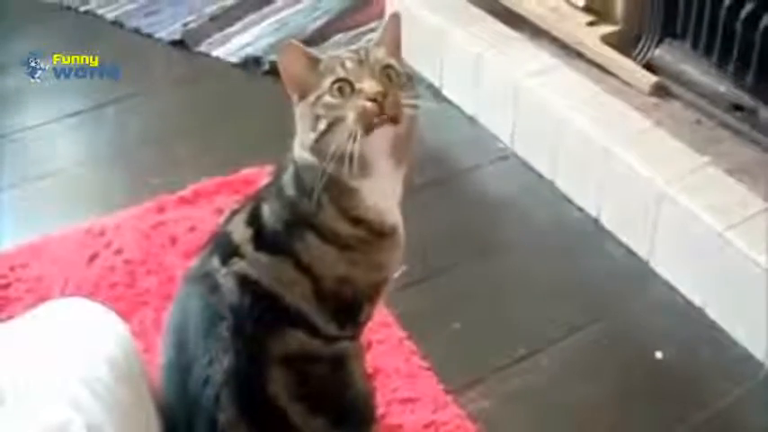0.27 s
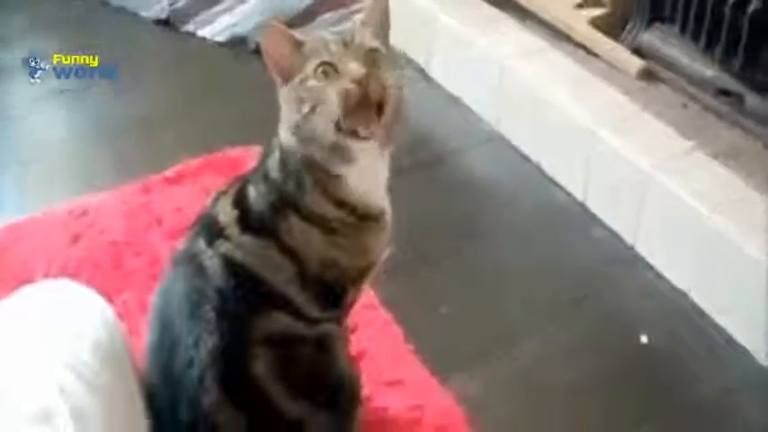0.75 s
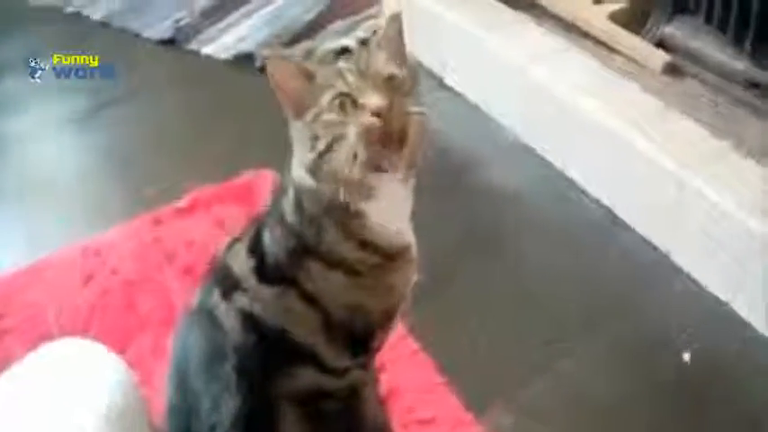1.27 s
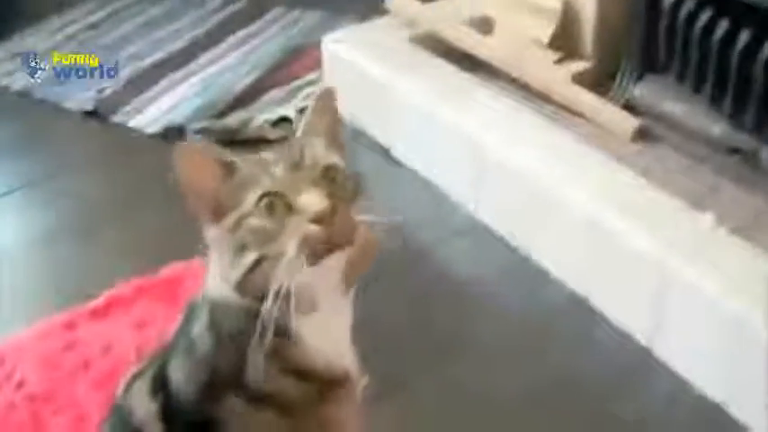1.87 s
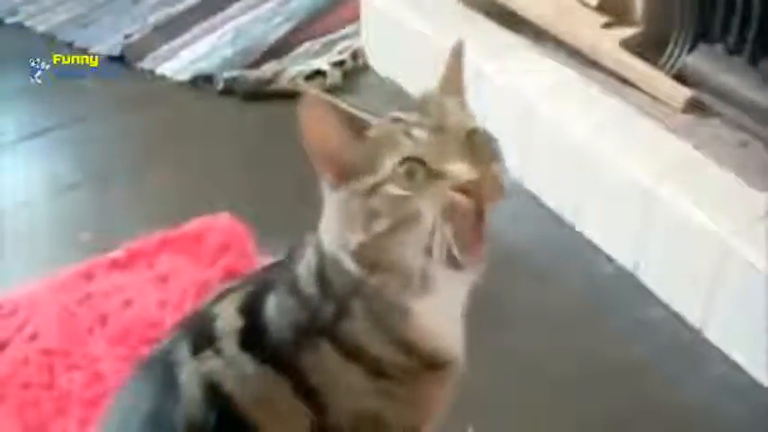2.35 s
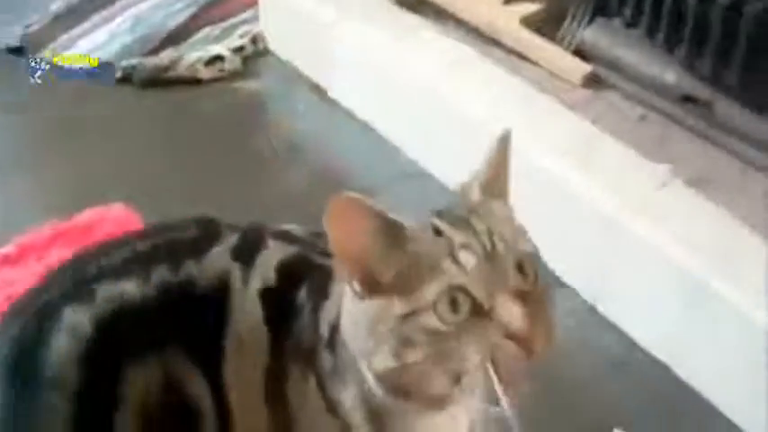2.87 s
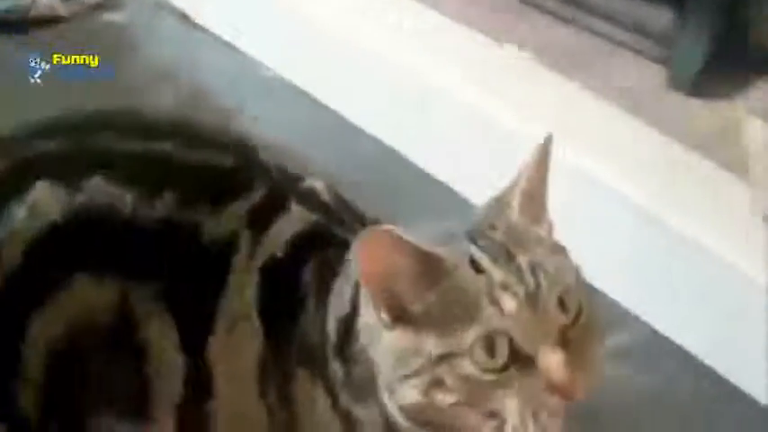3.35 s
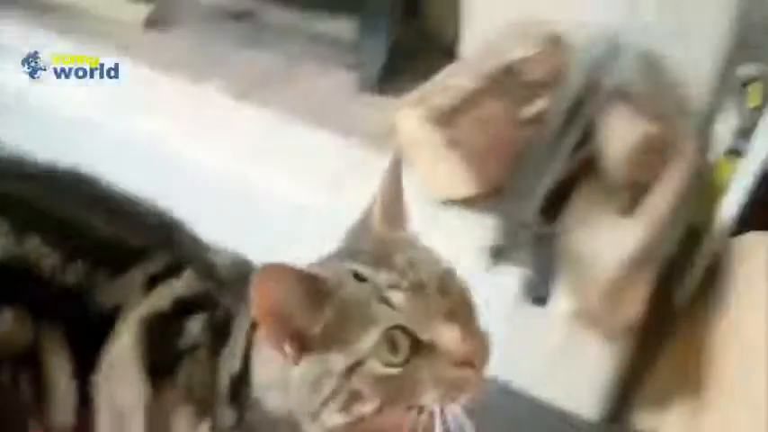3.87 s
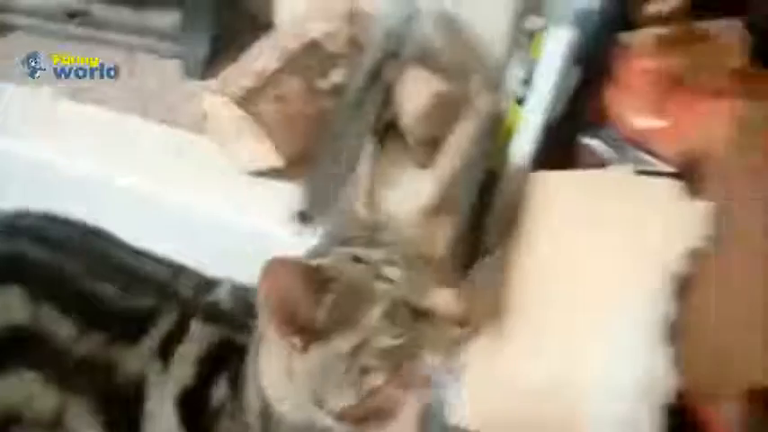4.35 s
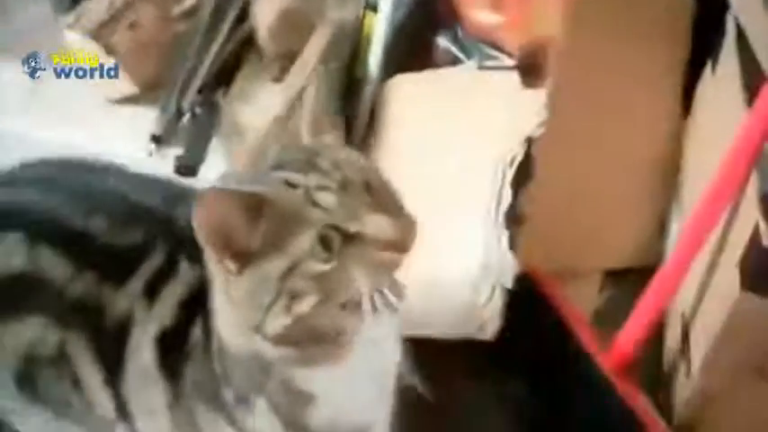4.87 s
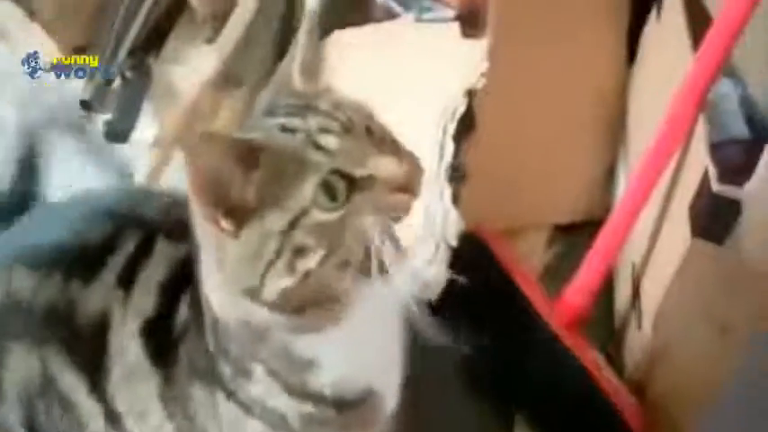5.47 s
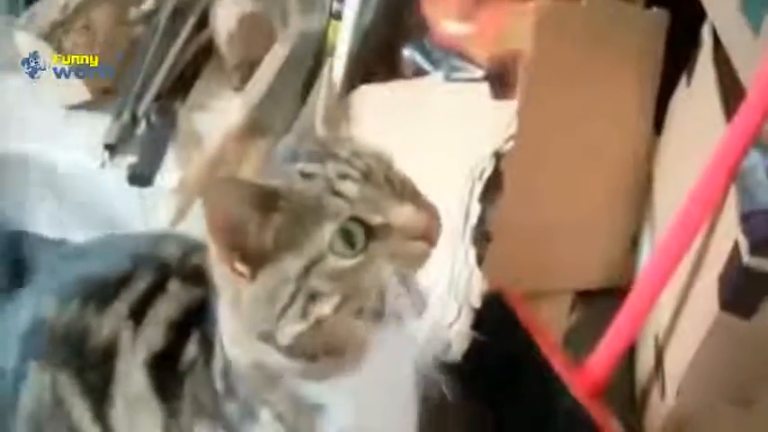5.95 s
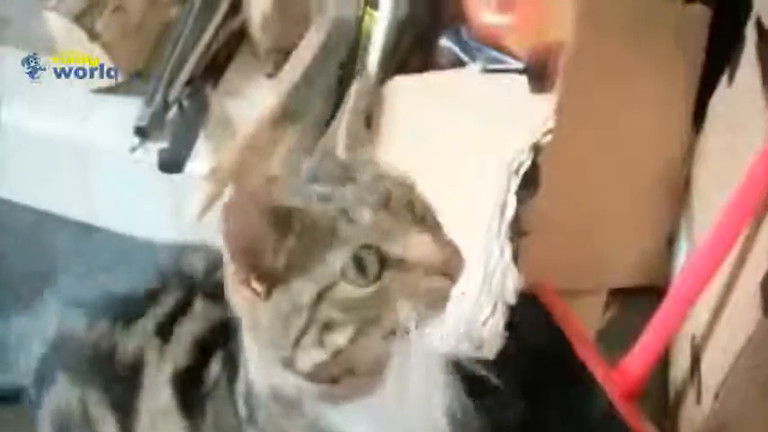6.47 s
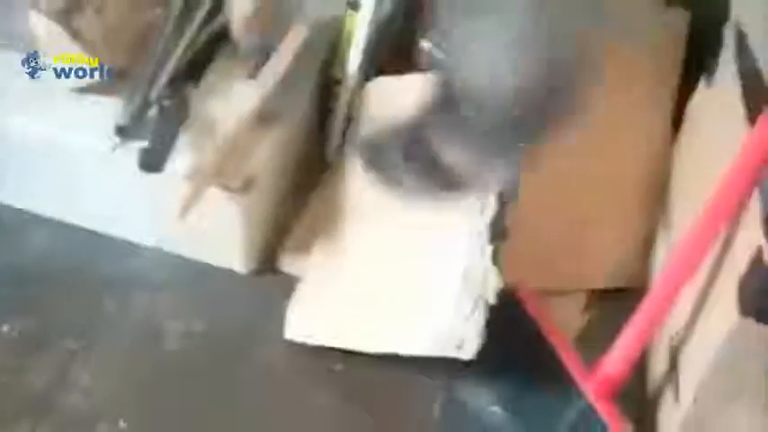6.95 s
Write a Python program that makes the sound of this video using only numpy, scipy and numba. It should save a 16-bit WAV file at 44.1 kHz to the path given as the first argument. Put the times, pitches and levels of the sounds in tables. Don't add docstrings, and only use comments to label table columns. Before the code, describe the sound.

A cat close to a cheap hand-held recorder makes clusters of very short, creaky, clicking chirps, with crisp tongue and tooth clicks among them. Quiet at first, they grow stronger after two seconds, when a few dull taps sound far off. A small tick hits the recorder before five seconds, and at seven a bump rattles it. Steady hiss and a short tiled-room echo surround everything.

```python
import sys
import numpy as np
from scipy import signal
from scipy.fft import rfft, irfft, next_fast_len
from scipy.io import wavfile
from scipy.ndimage import uniform_filter1d
from numba import njit

SR = 44100
rng = np.random.default_rng(int(sys.argv[2]) if len(sys.argv) > 2 else 0)


def level_to_linear(level):
    exponent = np.asarray(level, float) / 20
    return 10 ** exponent


def digitize_waveform(pressure):
    field = np.atleast_2d(pressure).T
    bounded = np.clip(field, -1, 1)
    quanta = np.round(bounded * 32767).astype(np.int16)
    wavfile.write(sys.argv[1], SR, quanta)


N = 317947

# start [s], voiced length [s], level as the mouth opens [dB], level as the folds stop [dB].
CALLS = [(0.170, 0.026, -26.5, -22), (0.300, .030, -32, -27), (0.75, .031, -26.5, -24.5),
         (0.873, 0.022, -32, -27), (0.975, 0.02, -24.5, -26), (1.412, .020, -38, -41),
         (1.514, 0.0136, -38, -30), (2.409, 0.032, -26, -16.5), (2.530, .022, -23, -22.5),
         (2.627, 0.011, -26, -20), (3.065, 0.0361, -26, -17), (3.219, 0.033, -21.5, -13),
         (3.336, .017, -25, -23), (3.811, 0.0236, -21.5, -15), (3.976, .012, -35.5, -28.5),
         (4.631, .010, -26, -24.5), (4.803, 0.02, -29, -29), (5.233, .031, -22.5, -15),
         (5.392, .020, -27, -22), (6.027, .031, -19, -15), (6.190, 0.023, -27, -15.5),
         (6.535, 0.028, -21.5, -12), (6.678, .030, -34, -30), (6.814, 0.0218, -21, -16)]
# mouth resonance [Hz], tooth-gap resonance [Hz],
# upper mouth level [dB].
MOUTH_SHAPES = [(2100, 3440, -23), (2026, 3500, -28), (2000, 3300, -27), (1990, 3530, -27.5),
                (2100, 3170, -26.5), (2050, 3490, -33.5), (1816, 3440, -33), (2090, 3342, -21),
                (2000, 3420, -27.5), (2030, 3400, -26.5), (2005, 3540, -25), (2160, 3280, -21),
                (2010, 3430, -26.5), (2150, 3480, -22.5), (1890, 3350, -31), (2040, 3190, -28.5),
                (1970, 3330, -28.5), (2110, 3234, -19.5), (2110, 3280, -20.5), (2070, 3510, -21),
                (2150, 3650, -20.5), (2128, 3230, -20.5), (1710, 3970, -28), (2080, 3100, -23.5)]
UPPER_SWELL_DB = (-12, -3.5, -0.5, -6, -17.5)
# start [s], length [s], level [dB], throat resonance [Hz],
# share by which the shut jaw lowers the mouth resonance.
THROAT_ONSETS = [(0.169, 0.032, -34.5, 894, .02), (0.296, .016, -29, 880, .01),
                 (0.751, 0.0245, -34.5, 874, .01), (0.975, .012, -35.5, 930, .01),
                 (2.406, 0.0287, -32, 971, .01), (2.527, .028, -35.5, 941, .01),
                 (3.062, 0.027, -33, 1050, .06), (3.218, .022, -27, 970, .01), (3.328, .016, -25, 985, .01),
                 (3.976, 0.01344, -31, 830, .01), (4.800, .026, -36.5, 1110, .02),
                 (5.233, .045, -29, 1000, 0.057), (5.384, .034, -32.5, 1020, 0.11),
                 (6.026, 0.034, -29.5, 1160, 0.14), (6.179, 0.043, -33, 1100, 0.091),
                 (6.535, .022, -27.5, 880, .01), (6.679, .033, -30, 900, .01),
                 (6.798, 0.022, -20.5, 978, 0.041)]
# centre [Hz], width [Hz], level [dB].
UPPER_MOUTH_RESONANCES = [(2772, 250, 0), (3300, 310, 0.5), (4150, 330, -18)]
# time [s], peak
# [dB], ring [Hz], ring t60 [s], crack relative to ring [dB].
MOUTH_CLICKS = [(0.189, -12, 2100, .03, -3), (2.431, -13, 2080, .02, 0), (5.253, -6.5, 1940, .014, -4),
                (5.312, -22, 2000, 0.055, -10), (6.213, -10, 2150, .012, -2), (6.5595, -11, 2120, .02, -4),
                (0.889, -17, 2049, 0.0264, 0), (1.3986, -15.5, 2074, 0.0169, -1),
                (1.546, -13, 1970, 0.024, -5), (3.166, -15, 2006, 0.0194, -4),
                (3.1858, -9, 2146, 0.018, -2), (3.3558, -7, 2062, 0.034, -1.5),
                (3.991, -12.5, 1974, 0.025, -5), (3.9949, -8, 1955, 0.024, -3),
                (4.6364, -13, 2080, .022, -3), (5.1803, -12, 2170, 0.0074, -6),
                (5.2053, -16, 2397, .008, -4), (5.4066, -4, 2170, 0.0086, -9),
                (5.422, -11.5, 3300, 0.013, -5), (6.713, -16.5, 4387, .012, -5),
                (5.7634, -18, 2256, .015, -3), (5.8638, -21.5, 2211, 0.0146, -6),
                (6.5058, -9, 2540, 0.0084, -4), (7.1173, -12.5, 2240, 0.0077, -3.5)]
# time [s], peak [dB], ring [Hz].
FAR_TAPS = [(2.085, -22, 748), (2.129, -22.5, 750), (2.177, -23, 730), (2.278, -21.5, 772),
            (2.504, -26.5, 648)]
# time [s], peak [dB], ring [Hz], ring t60 [s].
BODY_KNOCKS = [(3.991, -19.5, 121, 0.026), (4.9432, -9, 1410, 0.00356), (4.9434, -6, 3300, 0.0018),
               (4.9467, -16.5, 1000, 0.0041), (7.068, -12, 204, 0.0147), (7.0717, -10.5, 500, 0.0083),
               (7.0739, -10, 758, 0.017), (7.076, -9.5, 980, 0.0071), (7.135, -33, 35, 0.14),
               (7.164, -4.5, 148, 0.018), (7.163, -7.5, 1290, 0.00356), (7.1699, -5, 224, 0.0216),
               (7.177, -14, 88.3, 0.046), (7.191, -5.5, 679, 0.0147), (7.195, -7, 833, 0.0136),
               (7.197, -10, 2800, 0.0022), (7.188, -13, 49.87, .15), (7.208, -13, 600, 0.012)]
# frequency [Hz], level [dB per Hz].
HISS_SPECTRUM = [(7, -20), (12, 4), (17, -4), (32, -13), (60, -14.5), (120, -15), (500, -15), (1080, -16),
                 (2500, -18), (4500, -20.5)]
# frequency [Hz], gain [dB].
TOP_EDGE = [(4600, 0.5), (5150, -3.5), (5400, -10), (5900, -11), (6400, -20), (6800, -31.5), (7000, -43.5),
            (7250, -75)]
# time [s], level [dB].
TOP_BAND_OPENING = [
    (3.811, -65),
    (3.831, -44),
    (3.871, -76.5),
    (3.876, -83),
]

CREAK_HZ, HUM_HZ = 273.22, 510
FIRST_SLAP = .3
ATTACK_S, ATTACK_DB = .003, -9
CUT_S, LEAK_DB, LEAK_FOLLOWS = .011, -27.5, .4
TAIL_S, TAIL_DB = .032, -7.5
UPPER_FOLLOWS = .5
THROAT_ATTACK_S, THROAT_ATTACK_DB, THROAT_SAG_DB = .004, -8, -4
THROAT_RELEASE_S, THROAT_RELEASE_DB = .01, -8
JAW_DROPS_AT, JAW_DROP_S = .58, .003
JAW_RISE = .035
SHUT_JAW_DB = -60
MOUTH_WIDTH_HZ, TEETH_WIDTH_HZ, THROAT_WIDTH_HZ, UNDERTONE_HZ = 143, 140, 240, 500
ROOM_T60_S, ROOM_DB = .18, -15
HISS_DB = -32.5
OFFSET, OFFSET_WANDER = -.0161, .004


def chatter():
    db, level, hz, upper_db, teeth_hz = call_controls(mouth_calls())
    throat_db, throat_level, throat_hz, shut = call_controls(throat_calls())
    calling, throat_on = db > -75, throat_db > -70
    closed = np.clip((throat_db - db + 4) / 6, 0, 1)
    airy = np.clip((upper_db + 1.5) / 8, 0, 1)
    jaw_shut = shut * throat_on

    slaps = folds(closed, calling | throat_on, jitter=.25, spread_db=4.5)
    puff = signal.lfilter([1], [1, -.985], slaps) * rng.standard_normal(N)
    source = slaps + (.061 + .25 * airy) * puff + .04 * airy * rng.standard_normal(N)

    hz = hz * (1 + JAW_RISE * jaw_opening(calling)) * (1 - jaw_shut)
    focused = moving(source, hz, 1700)
    mouth = evened(moving(focused, hz, MOUTH_WIDTH_HZ * (1 + 1.1 * airy ** 2)), .013)

    low = slaps + .085 * puff + 1e-18
    undertone = evened(resonances(low, [(UNDERTONE_HZ, 150, 0)]), .008)
    throat = evened(moving(low, throat_hz, THROAT_WIDTH_HZ), .0074) + level_to_linear(-9.5) * closed * undertone

    soft = signal.lfilter([1], [1, -.6], source)
    teeth = evened(moving(soft, teeth_hz, TEETH_WIDTH_HZ), .017)
    upper = evened(resonances(soft, UPPER_MOUTH_RESONANCES), .012) + level_to_linear(2.5) * teeth
    spike_band = signal.butter(2, [1100, 3800], "band", fs=SR, output="sos")
    spike = evened(signal.sosfilt(spike_band, source), .02)

    upper_gain = level_to_linear(upper_db - 6 + SHUT_JAW_DB * jaw_shut)
    call = level_to_linear(-3.5 * airy) * mouth + upper_gain * (upper + level_to_linear(2.5) * spike)
    return level * call + throat_level * level_to_linear(1.5) * throat


def folds(closed, sounding, jitter, spread_db):
    unsteady = np.exp(jitter * (1 - .85 * closed) * drift(120))
    rate = (CREAK_HZ + (HUM_HZ - CREAK_HZ) * closed) * unsteady
    cycles = np.cumsum(rate) / SR
    since_start = cycles - np.maximum.accumulate(cycles * ~sounding)
    slap = np.diff(np.floor(since_start + 1 - FIRST_SLAP), prepend=0) > 0
    return (slap + 1e-9) * level_to_linear(spread_db * (.5 - .8 * closed) * rng.standard_normal(N))


def jaw_opening(sounding):
    i = np.arange(N)
    since_s = (i - np.maximum.accumulate(i * ~sounding)) / SR
    return np.clip(since_s / .0289 - 1, -1, 1)


def mouth_calls():
    calls = []
    for (s, length, open_db, stop_db), (hz, teeth_hz, upper_db) in zip(CALLS, MOUTH_SHAPES):
        times = s + np.cumsum([0, ATTACK_S, max(length - ATTACK_S, 1 / SR), CUT_S, TAIL_S])
        leak_db = LEAK_DB + LEAK_FOLLOWS * stop_db
        db = [open_db + ATTACK_DB, open_db, stop_db, leak_db, leak_db + TAIL_DB]
        follow_db = UPPER_FOLLOWS * (open_db - stop_db) * (times < times[2])
        upper = upper_db + np.array(UPPER_SWELL_DB) + follow_db
        calls.append([(t, level, hz, above - level, teeth_hz) for t, level, above in zip(times, db, upper)])
    return calls


def throat_calls():
    calls = []
    for s, length, db, hz, shut in THROAT_ONSETS:
        drop, end = s + max(JAW_DROPS_AT * length, THROAT_ATTACK_S), s + length
        sag_db, end_db = db + THROAT_SAG_DB * JAW_DROPS_AT, db + THROAT_SAG_DB
        calls.append([(s, db + THROAT_ATTACK_DB, hz, shut),
                      (s + THROAT_ATTACK_S, db, hz, shut),
                      (drop, sag_db, hz, shut),
                      (drop + JAW_DROP_S, sag_db, hz, 0),
                      (end, end_db, hz, 0),
                      (end + THROAT_RELEASE_S, end_db + THROAT_RELEASE_DB, hz, 0)])
    return calls


def call_controls(calls):
    t, rows = np.arange(N) / SR, np.concatenate(calls)
    rows = rows[np.argsort(rows[:, 0], kind="stable")]
    db, *others = [np.interp(t, rows[:, 0], column) for column in rows.T[1:]]
    starts = np.sort([call[0][0] for call in calls])
    ends = np.sort([call[-1][0] for call in calls])
    on = np.searchsorted(starts, t) > np.searchsorted(ends, t)
    return db - 60 * ~on, uniform_filter1d(on * level_to_linear(db), size=90), *others


def clicks():
    out, cracks = np.zeros(N), np.zeros(N) + 1e-18
    for s, db, hz, t60, crack_db in MOUTH_CLICKS:
        add(out, s, level_to_linear(db - .5) * ring(hz, t60))
        cracks[round(s * SR)] = level_to_linear(db + crack_db)
    bright = signal.lfilter([1, -1], [1, -.55], cracks)
    return out + level_to_linear(18.5) * resonances(cracks, UPPER_MOUTH_RESONANCES) + level_to_linear(12) * bright


def taps_and_knocks():
    out = np.zeros(N)
    swell = 1 - np.exp(-np.arange(round(.1 * SR)) / 15.2)
    for s, db, hz in FAR_TAPS:
        add(out, s, level_to_linear(db + 5.5) * ring(hz, .015) * swell)
    for s, db, hz, t60 in BODY_KNOCKS:
        add(out, s, -level_to_linear(db) * ring(hz, t60))
    return out


def room(x):
    t = np.arange(round(.3 * SR)) / SR
    tail = rng.standard_normal(len(t)) * level_to_linear(-60 * t / ROOM_T60_S) * (t > .004)
    return level_to_linear(ROOM_DB) * signal.fftconvolve(x, tail / np.sqrt(np.sum(tail ** 2)))[:N]


def hiss():
    size = next_fast_len(N)
    below_top = np.arange(size // 2 + 1) < size * 7500 / SR
    spectrum = rfft(rng.standard_normal(size)) * on_log_hz(HISS_SPECTRUM, size) * below_top
    return level_to_linear(HISS_DB + 1.19 * drift(2.84)) * rms_one(irfft(spectrum, size)[:N])


def rms_one(x):
    return x / np.sqrt(np.mean(x ** 2) + 1e-20)


def evened(x, window_s):
    return x / np.sqrt(abs(uniform_filter1d(x ** 2, round(window_s * SR))) + 1e-12)


def drift(rate):
    r = np.exp(-2 * np.pi * rate / SR)
    return rms_one(signal.lfilter([1], [1, -2 * r, r * r], rng.standard_normal(N + SR))[SR:])


@njit
def moving_resonance(x, cosine, r):
    y = np.zeros(len(x))
    for i in range(2, len(x)):
        y[i] = x[i] + 2 * r[i] * cosine[i] * y[i - 1] - r[i] * r[i] * y[i - 2]
    return y


def moving(x, hz, width_hz):
    r = np.exp(-np.pi * width_hz / SR + np.zeros(N))
    return moving_resonance(x - np.roll(x, 2), np.cos(2 * np.pi * hz / SR), r)


def resonances(x, table):
    out = 0
    for k, (hz, width_hz, db) in enumerate(table):
        r = np.exp(-np.pi * width_hz / SR)
        poles = [1, -2 * r * np.cos(2 * np.pi * hz / SR), r * r]
        out = out + (-1) ** k * level_to_linear(db) * signal.lfilter([1 - r * r, 0, r * r - 1], poles, x)
    return out


def ring(hz, t60):
    t = np.arange(round(.1 * SR)) / SR
    return np.sin(2 * np.pi * hz * t) * level_to_linear(-60 * t / t60)


def add(out, s, burst):
    i = round(s * SR)
    out[i:i + len(burst)] += burst[:N - i]


def on_log_hz(points, size):
    hz = np.maximum(np.arange(size // 2 + 1) * SR / size, 1)
    table_hz, table_db = np.transpose(points)
    return level_to_linear(np.interp(np.log(hz), np.log(table_hz), table_db))


def scene():
    cat = chatter() + clicks()
    return (cat + room(cat) + taps_and_knocks())[None]


def opened_top(dry):
    s, db = np.transpose(TOP_BAND_OPENING)
    t = np.arange(N) / SR
    band = signal.butter(8, [6300, 10900], "band", fs=SR, output="sos")
    top = signal.sosfilt(band, dry[0] + .013 * rng.standard_normal(N))
    return evened(top, .015) * level_to_linear(np.interp(t, s, db) + 2) * (t > s[0]) * (t < s[-1])


def roll_off(x):
    return signal.sosfilt(signal.butter(12, 11500, fs=SR, output="sos"), x)


def record(dry):
    size = next_fast_len(N + SR // 10)
    rounded = .9477 * np.tanh(dry / .986)
    narrow = irfft(rfft(rounded + hiss(), size) * on_log_hz(TOP_EDGE, size), size)[:, :N]
    return roll_off(narrow + opened_top(dry) + OFFSET + OFFSET_WANDER * drift(4))


dry = scene()
out = record(dry)
digitize_waveform(out)
```